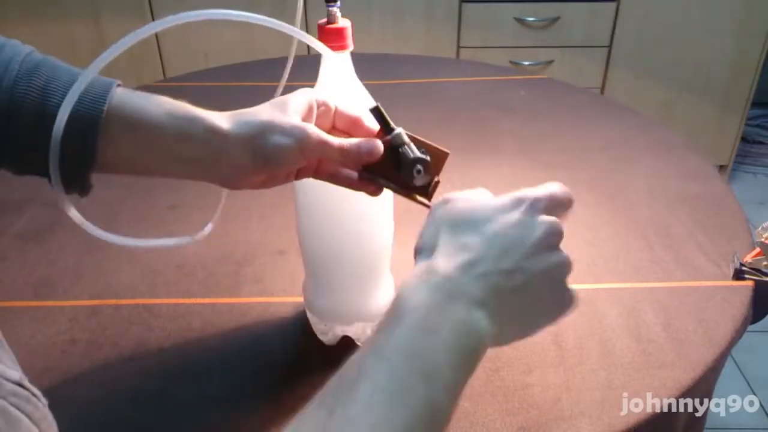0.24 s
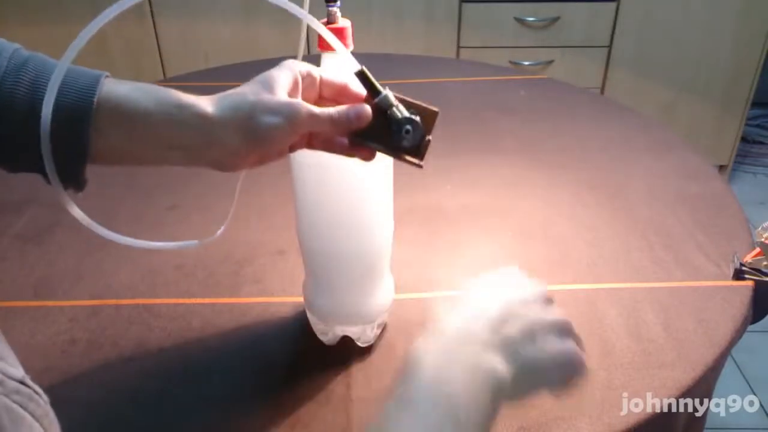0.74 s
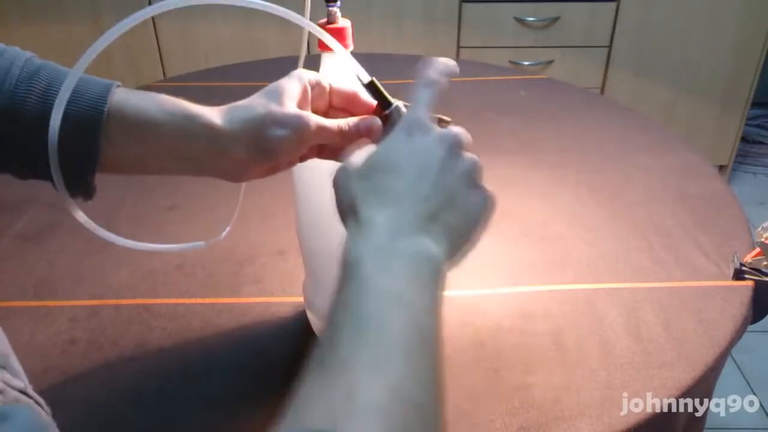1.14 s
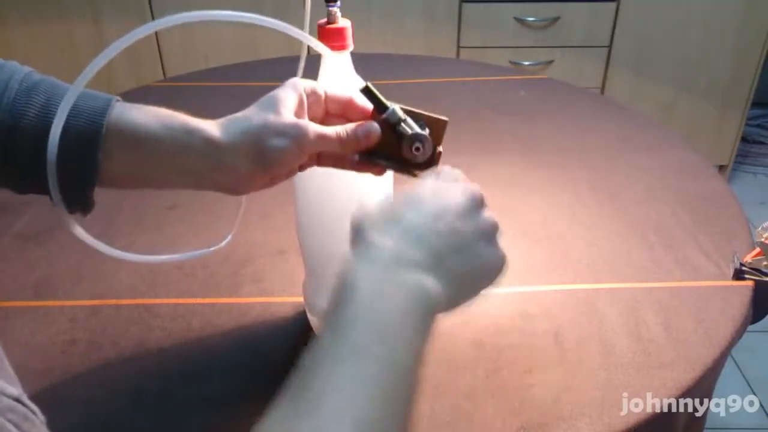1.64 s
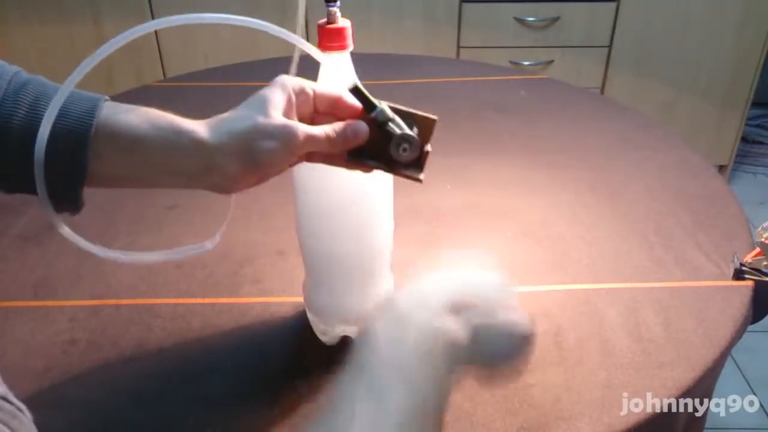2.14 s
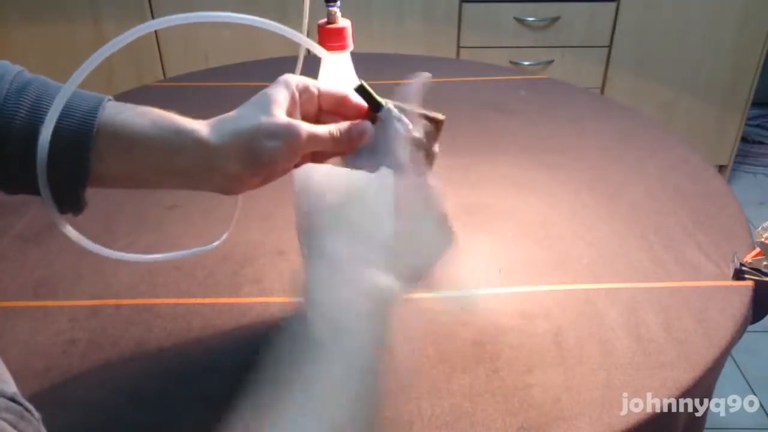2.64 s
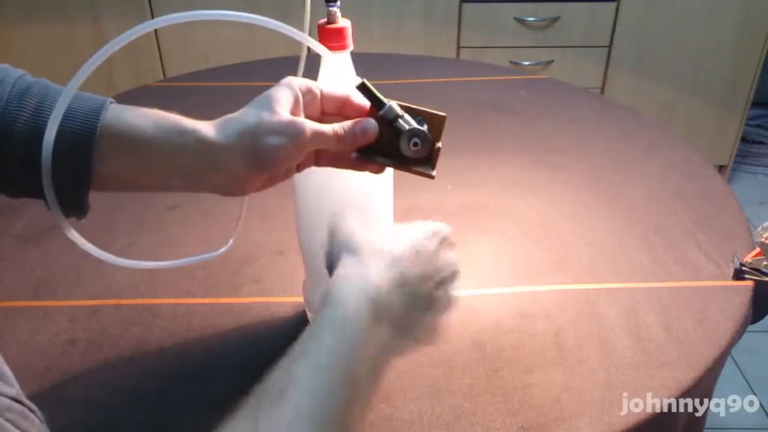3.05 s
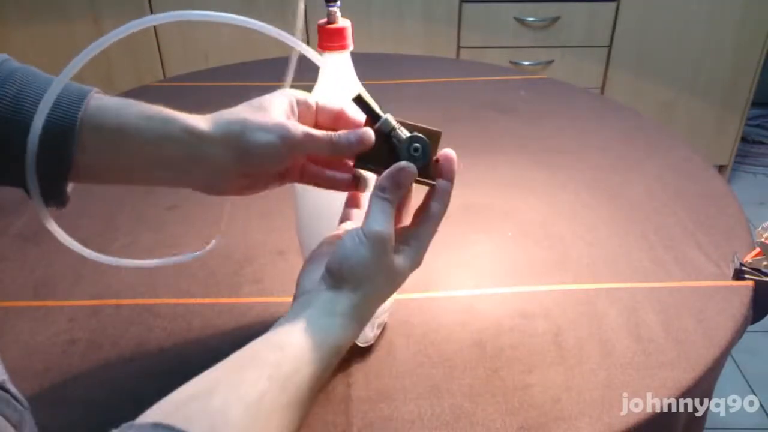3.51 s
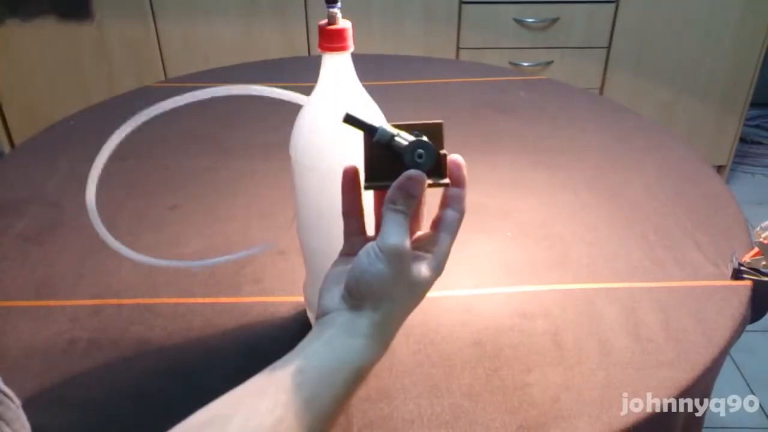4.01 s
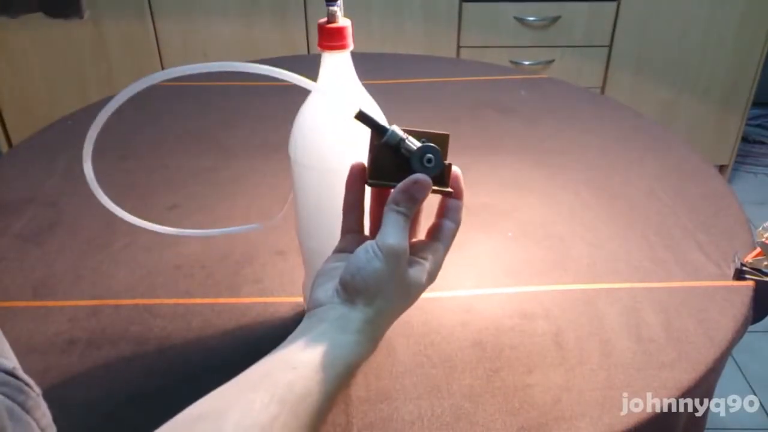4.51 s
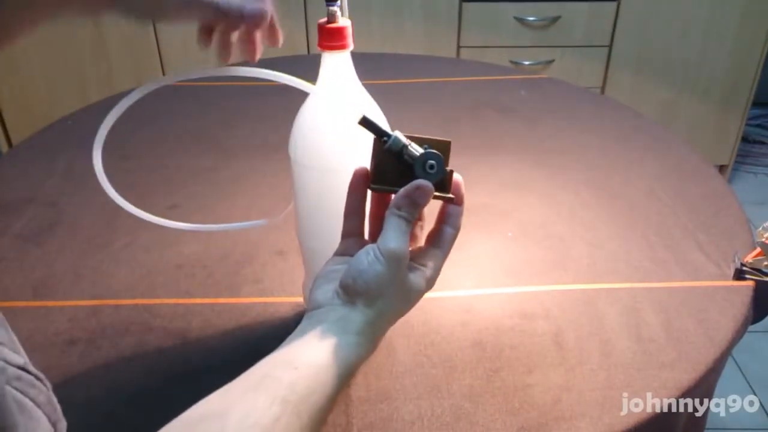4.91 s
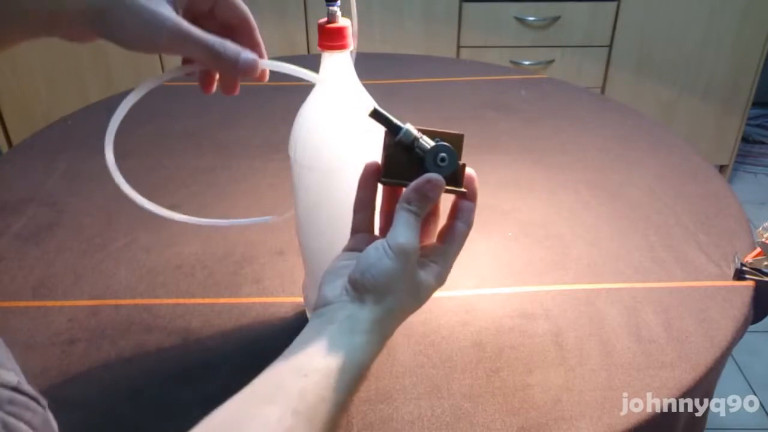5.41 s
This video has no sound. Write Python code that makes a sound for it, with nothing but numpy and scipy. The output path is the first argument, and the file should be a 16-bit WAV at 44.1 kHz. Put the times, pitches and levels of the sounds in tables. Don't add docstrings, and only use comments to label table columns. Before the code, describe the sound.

Short bursts of sharp hissing puffs start and die, then a miniature engine keeps running, its puffs merging into a harsh, fluttering buzz.

```python
import sys
import numpy as np
from scipy import signal
from scipy.fft import rfft, irfft
from scipy.io import wavfile
from scipy.ndimage import uniform_filter1d

SR = 44100
rng = np.random.default_rng(int(sys.argv[2]) if len(sys.argv) > 2 else 0)


def persist_wave(psi):
    counts = np.round(np.clip(psi, -1, 1) * 32767).astype(np.int16)
    wavfile.write(sys.argv[1], SR, np.atleast_2d(counts).T)


def linear_from_db(decibels):
    return 10 ** (np.asarray(decibels, float) / 20)


N = 249606

# (frequency [Hz], level [dB])
HOUSE_SPECTRUM = [(20, -4), (40, 9), (70, -14), (130, 1), (300, -22), (800, -24), (2000, -11), (16000, -48)]
# (delay [s], left level [dB], right level [dB])
REFLECTIONS = [
    (.0037, -10, -9.5),
    (.0052, -38, -40),
]
MODE_FREQUENCIES = [50, 74, 150, 186, 298, 410, 518, 594, 928, 1061]
# (bandwidth [Hz], level [dB])
MODE_WIDTHS_LEVELS = [(24.8, -21), (11.9, 4), (30, 4.5), (24.9, -3), (29.7, -1), (23.8, -13.5),
                      (20.5, -18.5), (18.5, -11), (29.6, -18), (35, -10)]
ROOM_T60_S, ROOM_TREBLE_T60_S, ROOM_DB = 0.68, 0.066, -4.5

# (time [s], level [dB])
LEAK_LEVEL = [(0, -34), (1.2, -35), (2.0, -32.5), (2.6, -34), (3.0, -32), (3.2, -34.5), (4.5, -30.5),
              (4.9, -29.5), (5.66, -28)]
# (frequency [Hz], level [dB])
LEAK_SPECTRUM = [(100, 1), (300, 0), (1000, -4), (2000, -3), (2650, 3), (3300, -0.5), (3900, 4.5),
                 (4600, 0), (6500, 5.5), (10000, -2.5), (12500, -3), (16000, -1)]
REST_DB, REST_SHARP_DB = -2, -12
REST_HOLLOW = 0.4

# (time [s], length [s], level [dB], ring [Hz])
FINGER_DRAGS = [
    (.2745, 0.0047, -23.5, 1430),
    (0.762, 0.005, -35, 900),
    (1.399, 0.0053, -36, 1600),
    (2.241, 0.0051, -20.5, 1470),
]
# (frequency [Hz], level [dB])
PLATE_SPECTRUM = [(20, 2), (50, -18.5), (100, 0.5), (200, 1.5), (400, -9.5), (800, -14.5), (16000, -60)]
SHAKE_CALMS_DB = 0.9

# (time [s], speed [turns/s])
WHEEL_SPINS = [
    [(.3022, 22.71), (.444, 22.01), (.594, 15.69)],
    [(.8123, 18.84), (.907, 23.22), (1.074, 21.03), (1.209, 13.13)],
    [(1.4282, 27.79), (1.514, 16.25), (1.595, 22.25), (1.678, 23.97), (1.85, 21.9), (1.995, 15.06)],
    [(2.2374, 36.06), (2.311, 30.1), (2.41, 25.11), (2.548, 14.75), (2.652, 22.77), (2.786, 24.19)],
    [(2.8247, 31.29), (2.987, 23.88), (3.241, 20.12), (3.391, 20.28), (4.067, 30.47), (4.225, 31.49),
     (4.532, 34.63), (4.828, 35.76), (5.051, 37.2), (5.425, 37.01), (5.674, 37.45)],
]
# (jet level [dB], pop level [dB])
DYING_SPINS = [
    (-17.5, -28.5),
    (-17.5, -26),
    (-17.5, -22.5),
]
JET_GAIN_DB_S, POP_SAG_DB_S = 4.5, 22.5
LAST_JET_DB, LAST_POP_DB = -5, -25
JET_SCATTER_DB, POP_SCATTER_DB = 0.98, -0.3
# (time [s], jet level [dB], pop level [dB])
HALF_STROKES = [
    (.2768, -30, -33),
    (1.4061, -26, -41),
    (2.2298, -18, -32),
]
# (time [s], added jet level [dB])
STROKE_ACCENTS = [
    (.302, -2),
    (.812, 3.5),
    (1.663, 3),
    (2.237, -3),
    (2.658, 1),
    (2.785, -2.5),
    (3.288, 0),
]
# (time [s], jet level [dB], pop level [dB], late flow level under the jet [dB])
RUNNING_PRESSURE = [(2.24, -16, -23, -8.5), (2.49, -13, -23, -12), (2.76, -16.5, -26.5, -4),
                    (2.84, -17.5, -23, -2.5), (3.0, -14, -23.5, -8), (3.4, -11.5, -23.5, -7),
                    (3.8, -12.5, -22.5, -4), (4.2, -12.5, -22, -1.5), (4.5, -12, -21.5, -1),
                    (4.9, -10.5, -22, -3), (5.2, -12.5, -20.5, 0.5), (5.66, -14.5, -23, 4.5)]
# (frequency [Hz], level [dB])
JET_SPECTRUM = [(300, -24.5), (1000, -7.5), (2000, -6.5), (3000, -2), (6000, 4.5), (10000, -1),
                (13000, -2.5), (16000, 1)]

# (frequency [Hz], level [dB])
PHONE_SHADOW = [(100, -3), (500, -5), (1500, -8), (4000, -12), (7000, -15), (10000, -13), (13000, -20),
                (16000, -22)]
# (frequency [Hz], level [dB])
LEFT_MIC_PORT = [(30, 2), (150, -7), (2000, 4.5), (3000, 6), (4100, 10), (5200, 3.5), (6500, -1), (8200, 7),
                 (9200, 10.5), (10200, 18.5), (11300, 9.5), (13000, 7.5), (16000, -8)]
# (frequency [Hz], level [dB])
RIGHT_MIC_PORT = [(30, 0), (150, -9.5), (2000, 3), (3000, 10), (4100, 7), (5200, 1.5), (6500, -2.5),
                  (8000, 4), (9500, -2.5), (11000, 12), (13000, 5), (16000, 8.5)]


def noise():
    return rng.standard_normal(N)


def convolve(x, response):
    return signal.fftconvolve(x, response)[:N]


def colour(x, points):
    hz, db = np.transpose(points)
    log_hz = np.log(np.linspace(1, SR / 2, 2049))
    log_gain = np.interp(log_hz, np.log(hz), db) * np.log(10) / 20
    cepstrum = irfft(log_gain)
    cepstrum[1:2048] *= 2
    cepstrum[2049:] = 0
    return convolve(x, irfft(np.exp(rfft(cepstrum))))


def band(x, hz, width_hz):
    return signal.lfilter(*signal.iirpeak(hz, hz / width_hz, fs=SR), x)


def above(x, hz):
    return signal.sosfilt(signal.butter(2, hz, "high", fs=SR, output="sos"), x)


def walk(rate):
    hold = int(SR / rate)
    return 1.2 * uniform_filter1d(noise()[np.arange(N) // hold], hold)


def speed():
    t = np.arange(N) / SR
    turning = t > WHEEL_SPINS[len(DYING_SPINS)][0][0]
    for spin in WHEEL_SPINS[:len(DYING_SPINS)]:
        turning |= (t > spin[0][0]) & (t < spin[-1][0])
    return turning * np.interp(t, *np.concatenate(WHEEL_SPINS).T)


def house():
    t = np.arange(N) / SR
    thud = np.exp(-((t - 1.41) / 0.031) ** 2) * band(noise(), 45, 40)
    thud = thud / np.abs(thud).max()
    mid, side = (colour(noise(), HOUSE_SPECTRUM) * linear_from_db(0.98 * walk(13.0)) for _ in range(2))
    return linear_from_db(-43.5) * (mid + linear_from_db(8) * thud + 0.34 * side * np.array([[1], [-1]]))


def kitchen(x):
    t = np.arange(SR // 2) / SR
    smooth = [.12], [1, -.88]
    bass = signal.lfilter(*smooth, rng.standard_normal(len(t)))
    boom = 0
    for hz, (width, db) in zip(MODE_FREQUENCIES, MODE_WIDTHS_LEVELS):
        boom = boom + linear_from_db(db) * band(x, hz, width)
    out = []
    for side in (0, 1):
        tail = rng.standard_normal(len(t))
        low = signal.lfilter(*smooth, tail)
        shared = 0.4 * bass + 0.12 * low
        tail = shared * linear_from_db(-60 * t / ROOM_T60_S) + (tail - low) * linear_from_db(-60 * t / ROOM_TREBLE_T60_S)
        onset = 1 - np.exp(-t / 0.0041)
        tail *= onset * linear_from_db(ROOM_DB) / np.sqrt(np.sum(tail ** 2))
        for delay, *db in REFLECTIONS:
            tail[int(delay * SR)] += linear_from_db(db[side] - 8.7 * side)
        out.append(convolve(x, tail) + boom)
    return np.array(out)


def leak():
    rest = uniform_filter1d(1. * (speed() == 0), SR // 16)
    db = np.interp(np.arange(N) / SR, *np.transpose(LEAK_LEVEL)) + REST_DB * rest
    streams = []
    for _ in range(2):
        hiss = colour(noise(), LEAK_SPECTRUM)
        dulling = (linear_from_db(REST_SHARP_DB * rest) - 1) * above(hiss, 11000)
        hollow = REST_HOLLOW * rest * band(hiss, 7600, 2700)
        flutter_db = 1.5 * walk(23.95) + 0.43 * walk(360)
        streams.append(linear_from_db(db - 3 + flutter_db) * (hiss + dulling - hollow))
    return streams


def stutter():
    return noise() * linear_from_db(4 * walk(400))


def flicks():
    t, out = np.arange(N) / SR, 0
    for at, length, db, hz in FINGER_DRAGS:
        touch = np.exp(-((t - at - length / 2) / (length / 2)) ** 2)
        drag = touch * band(stutter(), hz, 990)
        out = out + linear_from_db(db) * drag / np.abs(drag).max()
    return out


def shake(pops):
    motion = np.sqrt(np.maximum(uniform_filter1d(pops ** 2, SR // 12), 0))
    calm_db = SHAKE_CALMS_DB * np.maximum(speed() - 21, 0)
    return linear_from_db(9.5 - calm_db) * motion * colour(noise(), PLATE_SPECTRUM)


def strokes():
    rows = [HALF_STROKES]
    when, running_jet, running_pop, _ = np.transpose(RUNNING_PRESSURE)
    for k, spin in enumerate(WHEEL_SPINS):
        at, turns_per_s = np.transpose(spin)
        t = np.arange(at[0], at[-1] + .03, 1 / SR)
        turns = np.cumsum(np.interp(t, at, turns_per_s)) / SR
        count = round(np.interp(at[-1], t, turns)) + 1
        s = np.interp(np.arange(count), turns, t)
        if k < len(DYING_SPINS):
            first_jet, first_pop = DYING_SPINS[k]
            age, last = s - s[0], s == s[-1]
            jet_db = first_jet + JET_GAIN_DB_S * age + LAST_JET_DB * last
            pop_db = first_pop - POP_SAG_DB_S * age + LAST_POP_DB * last
        else:
            jet_db, pop_db = np.interp(s, when, running_jet), np.interp(s, when, running_pop)
        scatter = rng.standard_normal((len(s), 2)) * [JET_SCATTER_DB, POP_SCATTER_DB]
        rows.append(np.c_[s, np.c_[jet_db, pop_db] + scatter])
    rows = np.concatenate(rows)
    s, jet_db, pop_db = rows[np.argsort(rows[:, 0])].T
    for at, db in STROKE_ACCENTS:
        jet_db = jet_db + db * (np.abs(s - at) < .005)
    turn_s = np.clip(np.diff(s, append=s[-1] + .027), .025, .055)
    return s, jet_db, pop_db, turn_s


def engine():
    s, jet_db, pop_db, turn_s = strokes()
    when, *_, late_db = np.transpose(RUNNING_PRESSURE)
    late_db = np.interp(s, when, late_db)
    slowness = (turn_s / .027) ** .56
    around = np.arange(-150, 900)
    blow, sweep, squeeze, pops = np.zeros((4, N + SR))
    for at, jet_level, pop_level, late, slow in zip(s, jet_db, pop_db, late_db, slowness):
        i = int(at * SR) + around
        t = i / SR - at
        shut = t - .0079 * slow
        rise = 1 / (1 + np.exp(-(t - 0.00066 * slow) / (0.00044 * slow ** 0.71)))
        empty = np.exp(-(np.maximum(t, 0) / .0017) ** 1.58)
        closing = 1 + np.exp((shut - .0003) / 0.000097)
        blow[i] += linear_from_db(jet_level + 9.5) * rise * empty
        sweep[i] += linear_from_db(jet_level + late - 6.0) * rise / closing
        squeeze[i] += linear_from_db(jet_level + late - 5) * np.exp(-((shut - .0014) / .00045) ** 2)
        push = np.exp(-(t / .00012) ** 2) - .26 * np.exp(-((t - .00085) / .00042) ** 2)
        pull = np.exp(-(shut / .00025) ** 2) - .3 * np.exp(-((shut - .0009) / .0006) ** 2)
        pull_gain = linear_from_db(late - 7.0 - (slow - 2.5))
        pops[i] += linear_from_db(pop_level + 5.0) * (push - pull_gain * pull)
    return blow[:N], sweep[:N], squeeze[:N], pops[:N]


def jet(blow, sweep, squeeze):
    gas = colour(noise(), JET_SPECTRUM)
    big = gas - above(gas, 7270)
    small = above(colour(noise(), JET_SPECTRUM), 9400)
    big *= (blow + sweep) * linear_from_db(0.47 * walk(600))
    small *= (blow + linear_from_db(-1) * sweep) * linear_from_db(0.9 * walk(900))
    slit = squeeze * above(above(noise(), 13000), 13000)
    return linear_from_db(-8) * (big + small + linear_from_db(9.0) * slit)


def scene():
    near, far = leak()
    *flows, pops = engine()
    front, aside = jet(*flows), jet(*flows)
    knocks = pops + flicks() + shake(pops)
    shaded = colour(knocks + .5 * front + .8 * aside + .6 * near, PHONE_SHADOW)
    shaded = np.r_[np.zeros(4), shaded][:N]
    left, right = knocks + front + near, shaded + linear_from_db(-7.0) * far
    return house() + kitchen(knocks + aside) + [left, right]


def band_limit(x):
    return signal.sosfilt(signal.butter(12, 15900, fs=SR, output="sos"), x)


def record(dry):
    wet = np.array([colour(dry[0], LEFT_MIC_PORT), colour(dry[1], RIGHT_MIC_PORT)])
    wet = wet / (1 + np.abs(wet) ** 6) ** (1 / 6)
    wet = above(wet, 50)
    wet = signal.sosfilt(signal.ellip(10, .2, 70, 15900, fs=SR, output="sos"), wet)
    return band_limit(wet)


dry = scene()
out = record(dry)
persist_wave(out)
```